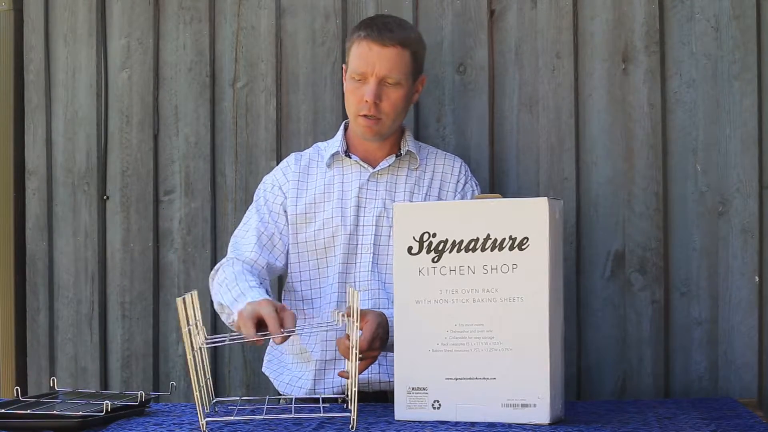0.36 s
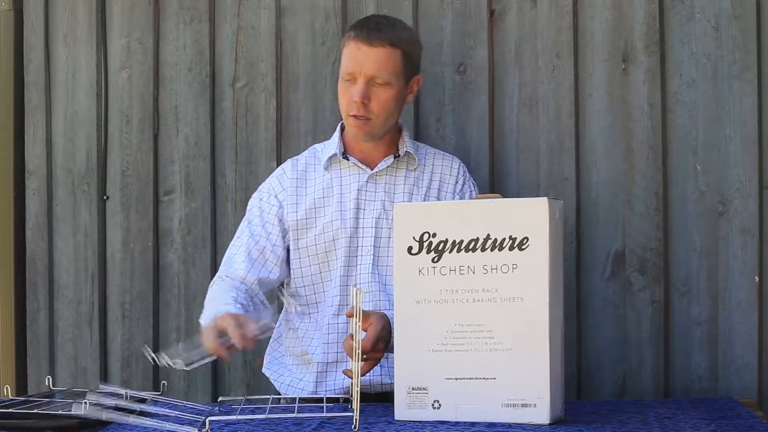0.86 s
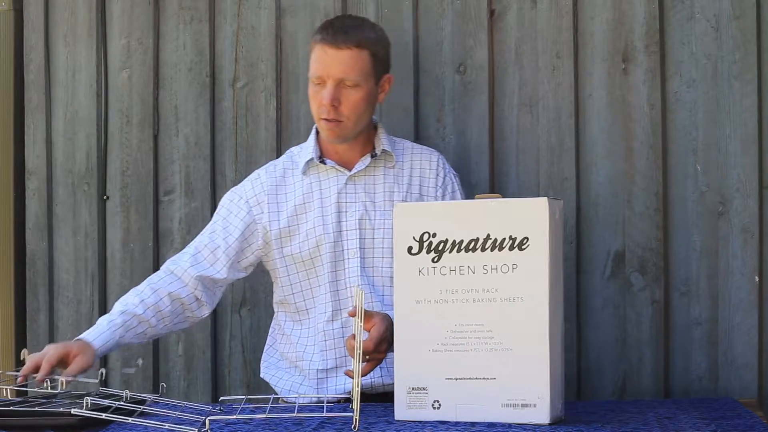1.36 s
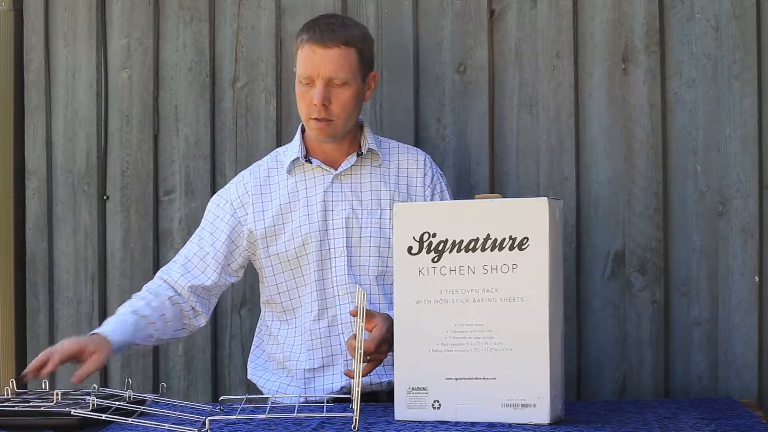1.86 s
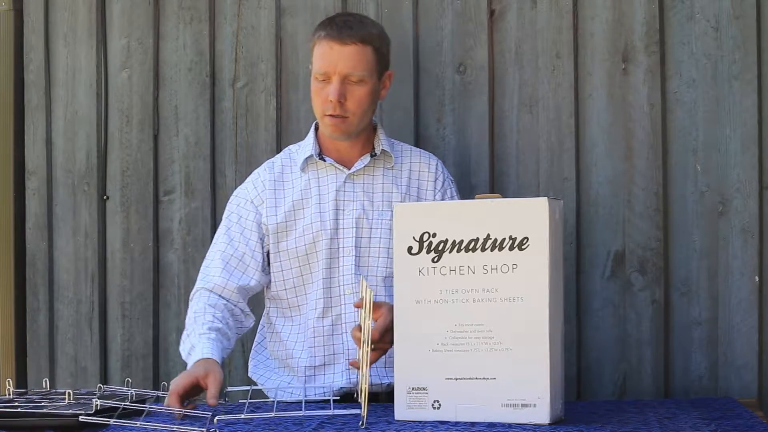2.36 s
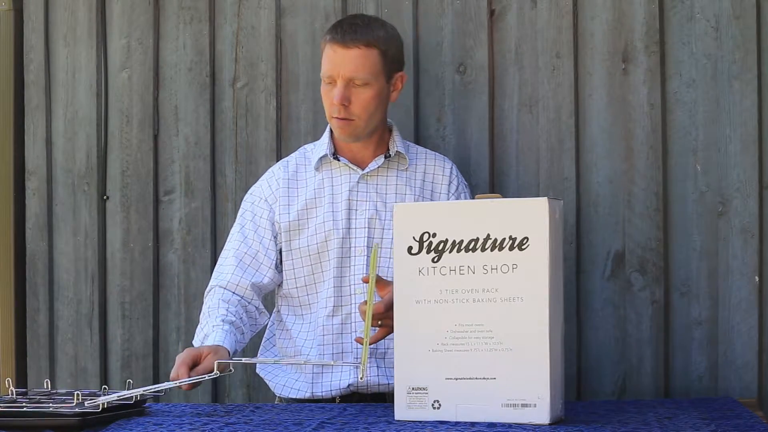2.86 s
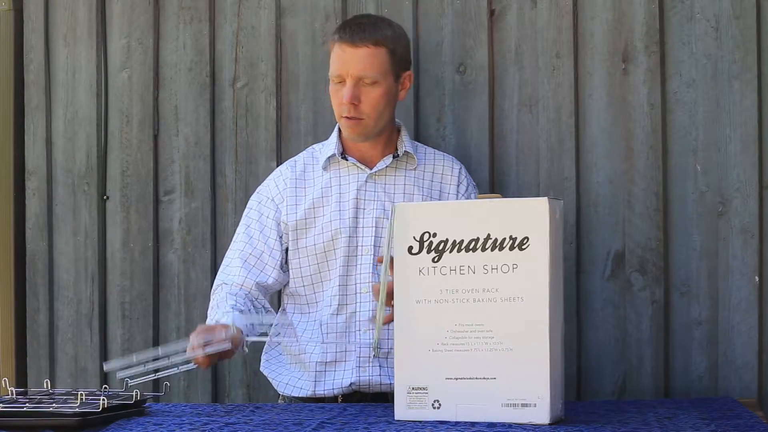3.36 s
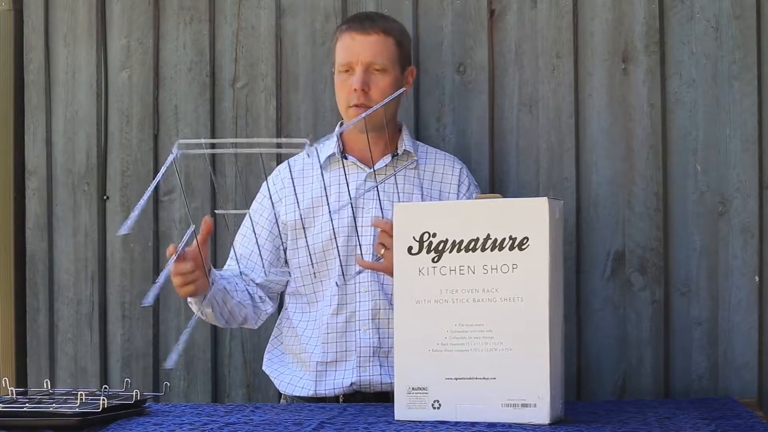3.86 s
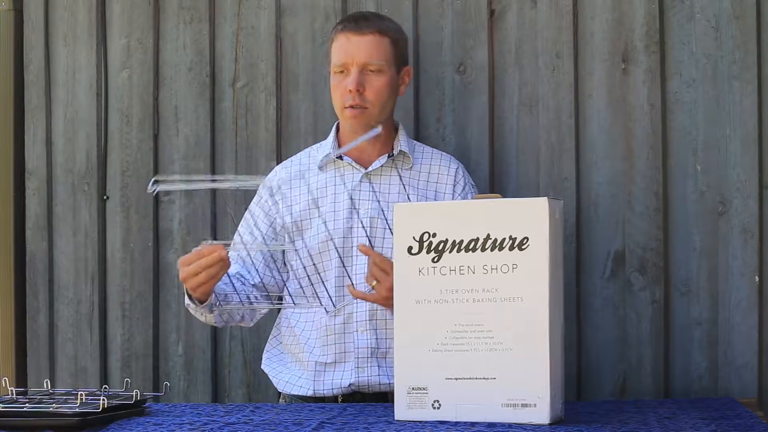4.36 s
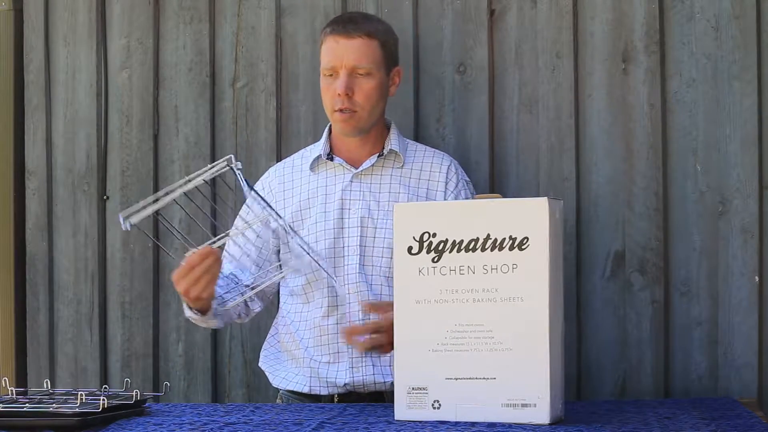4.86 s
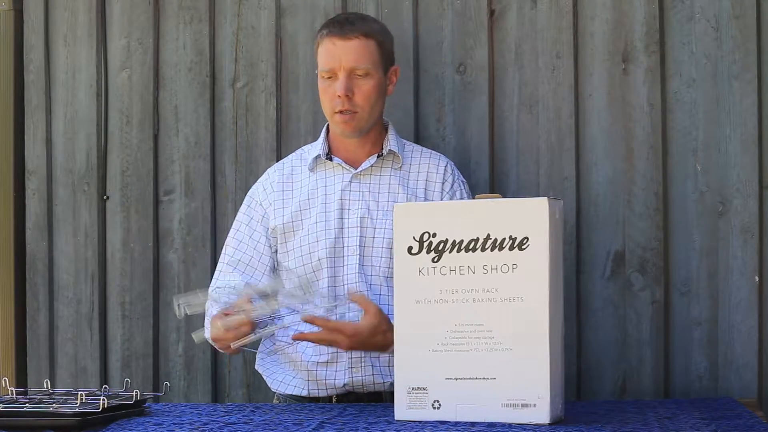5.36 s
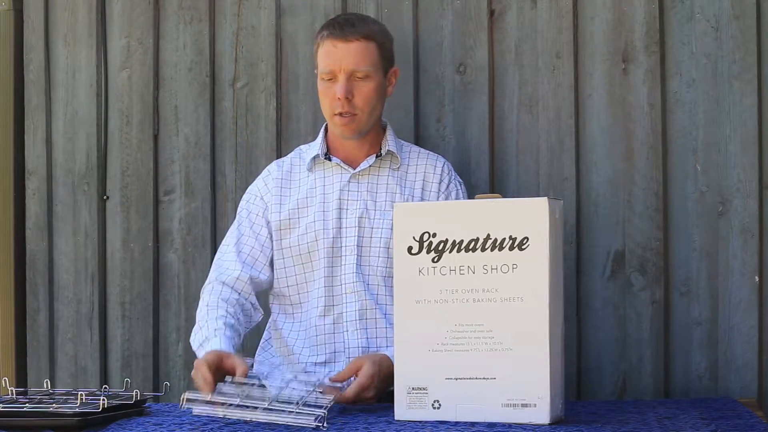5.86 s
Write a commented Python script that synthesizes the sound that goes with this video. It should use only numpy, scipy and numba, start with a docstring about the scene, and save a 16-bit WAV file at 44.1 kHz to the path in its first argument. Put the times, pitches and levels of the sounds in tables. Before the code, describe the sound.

A quiet outdoor hush with slight microphone hiss runs throughout, dry and without echo. At 0.15-0.35 s soft, cloth-muffled bumps sound on a table, with a bright, high hook clink near 0.3 s that rings thinly. At 0.77 s a hard clash of wire hits a pile of metal trays, its dense rattle continuing to about 1.2 s. After a brief lull, looser clatters come at 1.57-2.1 s, then scrapy rattling at 2.3-2.7 s and another cluster at 3.05-3.6 s, each with slight low table boom. Around 3.7-3.9 s a faint thin whistle slides upward, with a small tick. The light bare frame barely jingles until one loud, sharp clank at 4.43 s. A barely audible low hum swells near 4.9 s and fades by 5.2 s. Small crisp ticks from 5.1 s grow closer as the frame folds, ending with a strong clack at 5.85 s and a table thud at 5.95 s.

```python
"""Wire rack taken apart outdoors

A folding wire rack comes apart on a cloth-covered table before a plank wall; one microphone, no echo added.
Shelves unhook with a clink, wire clatters on a pile of trays, the bare frame knocks and ticks as it folds:
random contacts strike damped modes and noise tails. The table thuds on modes of its own. A thin whistle
rises once and a low hum comes and goes, both wavering sines, over a quiet air of coloured noise.
"""
import sys
import numpy as np
from scipy import signal
from scipy.fft import rfft, irfft
from scipy.io import wavfile
from scipy.ndimage import uniform_filter1d
from numba import njit

SR = 44100
rng = np.random.default_rng(int(sys.argv[2]) if len(sys.argv) > 2 else 0)


def attenuation_scalar(level_db):
    """Turn a level in dB into a linear amplitude multiplier (20 dB per decade)."""
    decades = np.asarray(level_db, float) / 20
    return 10 ** decades


def materialize(psi):
    """Save the field psi as 16-bit PCM at rate SR to the path in sys.argv[1].

    A 1-D psi becomes a single channel; in a 2-D psi each row is a channel.
    """
    bounded = np.clip(np.atleast_2d(psi).T, -1, 1)
    quanta = np.round(bounded * 32767).astype(np.int16)
    wavfile.write(sys.argv[1], SR, quanta)


N = 263453
T = np.arange(N) / SR  # s


def over_hz(table, hz):
    """Read a (f/Hz, value) table on a log-frequency axis."""
    f, value = np.transpose(table)
    return np.interp(np.log(np.maximum(hz, 1)), np.log(f), value)


def colour(x, table):
    """Filter a signal by the gains of a (f/Hz, level/dB) table."""
    gain = attenuation_scalar(over_hz(table, np.fft.rfftfreq(len(x), 1 / SR)))
    return irfft(rfft(x) * gain, len(x))


def unit(x):
    """Scale to energy 1."""
    return x / np.sqrt(np.sum(x ** 2))


def split(low, high, hz):
    """Bass of one sound joined to the treble of another."""
    bass = signal.sosfilt(signal.butter(4, hz, "low", fs=SR, output="sos"), low)
    treble = signal.sosfilt(signal.butter(4, hz, "high", fs=SR, output="sos"), high)
    return bass + treble


def contacts(rate, scatter_db):
    """Random instants where wire meets wire, rate per second: many faint, a few hard; mean power 1."""
    hit = rng.random(N) < rate / SR
    size = attenuation_scalar(scatter_db * rng.exponential(size=N)) * rng.choice([-1, 1], N) * hit
    return size / np.sqrt(np.mean(size ** 2))


def chatter(s, db, length, rise):
    """Force of one blow: a hard first touch just ahead of the peak, a moment of bouncing, a quick end."""
    age = np.maximum(T - s + 0.004, 0)  # starts 4 ms ahead of the listed time
    first = 1 + 1.27 * np.exp(-age / 0.003)
    onset = 1 - np.exp(-age / rise)
    ending = np.exp(-(age / max(length, 0.003)) ** 1.42)
    return attenuation_scalar(db) * first * onset * ending


def dense_body(force, spectrum, t60):
    """Countless close modes: a noise tail that dies by band, set off by every contact."""
    f, s, z = signal.stft(rng.standard_normal(SR // 2), SR, nperseg=256)
    band_t60 = over_hz(t60, f)[:, None]
    fade = attenuation_scalar(over_hz(spectrum, f)[:, None] - 60 * s / np.maximum(band_t60, 0.01))
    # slower bands start lower, so that the spectrum sets their energy
    tail = signal.istft(z * fade / np.sqrt(band_t60), SR, nperseg=256)[1]
    return signal.fftconvolve(force, unit(tail))[:N]


@njit
def ring(at, gains, poles, length):
    """Damped modes, each struck with its own gain at every contact."""
    out = np.zeros(length)
    for m in range(len(poles)):
        z, k = 1e-18 + 0j, 0
        for i in range(length):
            z *= poles[m]
            if k < len(at) and at[k] == i:
                z += gains[k, m]
                k += 1
            out[i] += z.imag
    return out


def modes(force, hz, db, t60, blows=None, focus_db=0., patchy_db=0.):
    """Clear modes; each contact wakes another mix, most near the pitch that the last blow favours."""
    at = np.flatnonzero(np.abs(force) > 1e-6)
    poles = np.exp(2j * np.pi * hz / SR - np.log(1000) / (t60 * SR))
    energy = np.sum(attenuation_scalar(db) ** 2 * t60 * SR / (4 * np.log(1000)))
    weight = attenuation_scalar(db) / np.sqrt(energy)
    gains = force[at, None] * weight * rng.standard_normal((4096, len(hz)))[at % 4096]
    # the touching wires change every 60 ms or so
    gains *= attenuation_scalar(patchy_db * rng.standard_normal((N // 2600 + 1, len(hz))))[at // 2600]
    if blows is not None:
        s, place_hz = blows
        # a blow takes over 10 ms ahead of its listed time
        last = np.maximum(np.searchsorted(s, T[at] + 0.01) - 1, 0)
        octaves = np.log2(hz / place_hz[last][:, None])
        gains *= attenuation_scalar(focus_db * np.exp(-(octaves / 0.2) ** 2))
    return ring(at, gains, poles, N)


def wires(force, spectrum, t60, lo_hz, hi_hz, stretch, count):
    """Many cross wires, each a faint line of its own; stretch scales how long they ring."""
    place, spread = rng.random(count), rng.random(count)
    hz = lo_hz + (hi_hz - lo_hz) * (np.arange(count) + place) / count
    long = stretch * over_hz(t60, hz) * (0.6 + 0.8 * spread)
    return modes(force, hz, over_hz(spectrum, hz) - 10 * np.log10(long), long, patchy_db=2.5)


def tone(curve, waver, flicker_db):
    """An unsteady, flickering sine along a pitch and level curve, fading at its ends."""
    s, hz, db = np.transpose(curve)
    drift, flutter = uniform_filter1d(rng.standard_normal((2, N)), 400) * 20
    edge = np.clip(np.minimum(T - s[0], s[-1] - T) / 0.016, 0, 1)
    pitch = np.interp(T, s, hz) * (1 + waver * drift)
    level = edge * attenuation_scalar(np.interp(T, s, db) + flicker_db * flutter)
    return np.sqrt(2) * level * np.sin(2 * np.pi * np.cumsum(pitch) / SR)


# spectrum of the open air and the microphone: f/Hz, relative level/dB per Hz
AIR_SPECTRUM = [(15, -41), (25, -14), (97, 1), (259, 1), (617, -2.5), (3150, -6), (5880, -21), (10400, -20),
                (15200, -29), (16500, -47)]


def air():
    """Steady outdoor hush and microphone hiss: coloured noise."""
    air_db = -50.5  # rms of the noise
    return attenuation_scalar(air_db) * np.sqrt(N) * unit(colour(rng.standard_normal(N), AIR_SPECTRUM))


# wire knocking: blows on the pile of racks and trays, and from 3.889 s faint knocks of the swinging frame:
# t/s, relative level/dB, chatter/s, favoured f/Hz
WIRE_KNOCKS = [(0.765, -6.5, 0.032, 2620), (0.8955, -15.5, 0.064, 2880), (0.949, -22, 0.071, 4230),
               (1.0154, -21, 0.019, 4100), (1.0876, -16, 0.019, 3800), (1.187, -23.5, 0.04, 1700),
               (1.36, -35, 0.01, 3540), (1.447, -37, 0.012, 6250), (1.569, -17.5, 0.067, 1930),
               (1.6077, -27, 0.1, 3220), (1.6996, -15, 0.069, 5530), (1.778, -19, 0.12, 3370),
               (1.976, -23.5, 0.029, 1860), (2.0787, -32, 0.045, 2580), (2.131, -35.5, 0.053, 4570),
               (2.1695, -33.5, 0.037, 6730), (2.3324, -30, 0.22, 2900), (2.427, -28, 0.062, 1590),
               (2.528, -20.5, 0.13, 1660), (2.753, -48.5, 0.3, 2880), (3.0083, -39.5, 0.036, 8000),
               (3.053, -24, 0.036, 4140), (3.1832, -21.5, 0.026, 2260), (3.2574, -24, 0.016, 3370),
               (3.3515, -20, 0.064, 1550), (3.59, -35, 0.051, 1800), (3.889, -37, 0.096, 3230),
               (4.055, -36, 0.075, 5140), (4.255, -38.5, 0.064, 2950), (4.348, -46.5, 0.36, 3300),
               (4.619, -53.5, 0.095, 4650), (5.233, -50, 0.019, 1630)]
# the pile shaking on once disturbed: start t/s, relative level/dB, steady for/s, then fall/dB per s
RATTLE = [(0.0, -39, 0.0021, 600), (0.8, -16, 0.32, 73.5), (1.74, -29, 0.031, 21), (2.44, -37, 0.067, 34),
          (3.08, -33.5, 0.41, 63)]
# clear lines of the wire clatter: f/Hz, relative level/dB
PILE_LINES = [(1028, -41), (1453, -60.5), (1529, -38.5), (1658, -39.5), (1981, -45.5), (2266, -41),
              (2837, -54.5), (2945, -40.5), (3187, -40), (3790, -66), (3978, -46.5), (4097, -50.5),
              (4651, -39), (5076, -45.5), (5399, -61), (6255, -48), (6611, -62), (7434, -40), (8344, -38),
              (8877, -61)]
# spectrum of its dense modes: f/Hz, relative level/dB per Hz
PILE_BODY = [(120, -4), (200, -8), (509, -13), (1020, -3), (1300, -8), (1500, -2), (2610, -2), (3970, -1),
             (5520, -10), (9230, -7.5), (15100, -22), (16000, -28.5)]
# time its dense modes take to fall 60 dB: f/Hz, T60/s
PILE_T60 = [(300, 0.6), (1500, 0.16), (5000, 0.15), (12000, 0.15)]


def wire_clatter():
    """Dense knocks of wire and a sparser rattle drive lines and a body, sharp contacts its treble."""
    treble_db, treble_db_per_db = -6, -0.05  # treble share of a blow at -23 dB; harder blows gain less
    rattle_treble_db = -10
    dull, bright = np.zeros(N), np.zeros(N)
    hits, taps = contacts(1800., scatter_db=2.5), contacts(600., scatter_db=1.5)
    for s, db, length, _ in WIRE_KNOCKS:
        sharp_db = db + treble_db + treble_db_per_db * (db + 23)
        dull += hits * chatter(s, db, length, rise=0.003)
        bright += hits * chatter(s, sharp_db, 1.16 * length, rise=0.00031)
    for s, db, hold, fall_db in RATTLE:
        shake = taps * (T >= s) * attenuation_scalar(db - fall_db * np.maximum(T - s - hold, 0))
        dull += shake
        bright += attenuation_scalar(rattle_treble_db) * shake

    hz, db = np.transpose(PILE_LINES)
    blows = np.transpose(WIRE_KNOCKS)[[0, 3]]
    lines = modes(dull, hz, db, 0.75 * over_hz(PILE_T60, hz), blows, focus_db=7.5, patchy_db=5.0)
    dull_body = dense_body(dull, PILE_BODY, PILE_T60)
    bright_body = dense_body(attenuation_scalar(8) * bright, PILE_BODY, PILE_T60)
    body = split(dull_body, bright_body, 5160.0)
    rods = wires(dull, PILE_BODY, PILE_T60, 800., 5500., stretch=0.71, count=80)
    spokes = wires(bright, PILE_BODY, PILE_T60, 5500., 15500., stretch=0.73, count=64)
    mix = attenuation_scalar(-14.0) * lines + attenuation_scalar(-6.5) * body + attenuation_scalar(-10.5) * rods + attenuation_scalar(-8) * spokes
    # keep the wire clatter thin: cut its bass below 190 Hz
    no_bass = signal.butter(2, 190, "high", fs=SR, output="sos")
    return signal.sosfilt(no_bass, mix)


# frame feet and hands bumping the table: t/s, relative level/dB, favoured f/Hz
THUDS = [(0.148, -34.5, 262), (0.222, -25, 359), (.242, -35, 333), (0.283, -45.5, 570), (0.333, -32, 297),
         (2.954, -44.5, 202.8), (5.9522, -22.5, 930)]
# modes of the table top: f/Hz, relative level/dB, T60/s
TABLE = [(158, -14.5, 0.25), (226, 0, .14), (302, -6, 0.14), (387, -2, 0.11), (579.5, -1, 0.057),
         (668, -1.5, 0.09), (930, -15, 0.072), (1110, -7.5, 0.065), (1460, -20.5, .03)]
# modes of the table legs: f/Hz, relative level/dB, T60/s
LEGS = [(58.7, 5, 0.59), (81.5, -3.5, 0.27)]


def table():
    """Soft bumps through the cloth, and every wire knock, boom in the table top and shake its legs."""
    thud_s, thud_legs_db = 0.034, -22  # decay of a bump in the top; share that shakes the legs
    knock_top_db, knock_thud_hz = -14, 173  # what a wire knock passes to the top
    knock_legs_db, legs_db_per_db = -44, 0.64  # the legs answer less than dB for dB
    hits = contacts(730.0, scatter_db=1.0)
    rows = [(s, db, db + thud_legs_db, hz) for s, db, hz in THUDS]
    for s, db, *_ in WIRE_KNOCKS:
        rows.append((s, db + knock_top_db, knock_legs_db + legs_db_per_db * db, knock_thud_hz))
    s, top_db, legs_db, place_hz = np.transpose(sorted(rows))
    legs = hits * sum(chatter(*row, 1.8 * thud_s, rise=0.0049) for row in zip(s, legs_db))
    top = hits * sum(chatter(*row, thud_s, rise=0.0087) for row in zip(s, top_db))
    leg_boom = modes(legs, *np.transpose(LEGS))
    top_boom = modes(top, *np.transpose(TABLE), (s, place_hz), focus_db=18.0)
    return attenuation_scalar(3.5) * leg_boom + attenuation_scalar(-6.5) * top_boom


# a shelf hook slipping off its rail: t/s, relative level/dB, chatter/s, favoured f/Hz
HOOKS = [(.2165, -51, .02, 9800), (0.232, -42, 0.1, 10700), (0.309, -21.5, 0.0094, 8000),
         (0.361, -34.5, .008, 8200), (0.395, -43, 0.024, 4457)]
# clear modes of the loose shelf: f/Hz, relative level/dB, T60/s
SHELF = [(4140, -30.5, 0.71), (4457, -16.5, 1.4), (5620, -7.5, .2), (7730, -8, 0.19), (8200, -14.5, 0.57),
         (9800, -9.5, 0.3), (12700, -6, 0.099), (13400, -5, 0.52), (15300, -15, 0.23)]
# spectrum of the dense modes of shelf and bare frame: f/Hz, relative level/dB per Hz
WIRE_BODY = [(710, -41), (1200, -23), (1770, -19), (2590, -16), (2830, -16.5), (3740, -7.5), (5840, -14),
             (10700, -2.5), (16000, -21.5)]
# time those dense modes take to fall 60 dB: f/Hz, T60/s
WIRE_T60 = [(2000, 0.14), (8000, 0.13), (15000, 0.085)]


def shelf():
    """The hook scrapes free and the loose shelf rings on a few long lines."""
    force = contacts(4000., scatter_db=2.2) * sum(chatter(*row[:3], rise=0.0008) for row in HOOKS)
    lines = modes(force, *np.transpose(SHELF), np.transpose(HOOKS)[[0, 3]], focus_db=13.0)
    return attenuation_scalar(-11.5) * lines + attenuation_scalar(-5.0) * dense_body(force, WIRE_BODY, WIRE_T60)


# a thin whistle: t/s, f/Hz, level/dB
WHISTLE = [(3.7, 4140, -36), (3.748, 4280, -70), (3.78, 5040, -56), (3.826, 6170, -61), (3.9, 6240, -65.5)]


def whistle():
    """A thin sine that rises once, its pitch and level unsteady."""
    return tone(WHISTLE, 0.007, 3.5)


# bars of the bare frame knocking: t/s, relative level/dB, chatter/s, favoured f/Hz of thin bars, of thick bars
TICKS = [(3.8476, -30.5, 0.0092, 9840, 2460), (4.1194, -53, 0.016, 13500, 4000),
         (4.4256, -5, 0.025, 10000, 3800), (4.79, -43.5, 0.01, 9040, 3730), (4.887, -56, .02, 9100, 4600),
         (5.093, -33.5, 0.014, 9780, 3800), (5.1347, -40, 0.016, 8280, 3000),
         (5.328, -27, 0.033, 8900, 5700), (5.4395, -39, 0.014, 9190, 3690),
         (5.475, -30, 0.019, 10100, 4030), (5.515, -29, 0.017, 14800, 3600),
         (5.6037, -24.5, 0.023, 15100, 3200), (5.85, -13.5, 0.035, 11000, 2665),
         (5.953, -29.5, .03, 10300, 5200)]
# clear modes of the frame: f/Hz, relative level/dB, T60/s
FRAME = [(2680, -11, 0.52), (3450, -7, 0.38), (3960, -15.5, 0.77), (4500, 2, 0.1), (5770, -8, 0.18),
         (7390, 11, 0.29), (7800, -3, .25), (8300, 5, 0.18), (9100, -5, 0.19), (9800, 5.5, 0.03),
         (10700, -42, 0.044), (11730, -13, 0.089), (12400, -14, 0.092), (13500, 0, .11), (14210, -8, 0.27),
         (14910, 4, 0.17), (15400, -11, 0.13)]
# the loose frame jingling in the air: t/s, relative level/dB
SWING = [(3.75, -81), (4.0, -73), (4.4, -70), (4.55, -77), (5.0, -71), (5.8, -64)]


def frame():
    """Thin bars tick, thick bars sound the range below them, and the cross wires jingle faintly."""
    thick_share_db, thick_db_per_db = 1.5, -0.39  # share of the thick bars in a -25 dB knock; its slope
    hits = contacts(4000., scatter_db=1.5)
    s, db, length, thin_hz, thick_hz = np.transpose(TICKS)
    thick_db = db + thick_share_db + thick_db_per_db * (db + 25)
    thick = hits * sum(chatter(*row, rise=0.0066) for row in zip(s, thick_db, length))
    thin = hits * sum(chatter(*row, rise=0.0031) for row in zip(s, db, length))
    # next to silent outside the swing
    jingle = contacts(120., scatter_db=4.) * attenuation_scalar(np.interp(T, *np.transpose(SWING), -200, -200))
    spokes = wires(attenuation_scalar(-23) * thin + jingle, WIRE_BODY, WIRE_T60, 2500., 15500., stretch=2.4, count=90)

    def bars(force, place_hz):
        """Clear modes near each knock's pitch, and a dense body."""
        lines = modes(force, *np.transpose(FRAME), (s, place_hz), focus_db=19.5, patchy_db=5.0)
        return attenuation_scalar(-21.5) * lines + attenuation_scalar(-6.5) * dense_body(force, WIRE_BODY, WIRE_T60)

    return split(bars(thick, thick_hz), bars(thin, thin_hz), 8600.0) + spokes


# a low hum: t/s, f/Hz, level/dB
HUM = [(3.95, 109.6, -69), (4.914, 109.8, -59.5), (5.2, 114, -69)]


def hum():
    """A low, wavering sine that comes and goes."""
    return tone(HUM, 0.019, 1.5)


def scene():
    """All sources reach one microphone; both channels are alike."""
    mono = wire_clatter() + shelf() + frame() + table() + whistle() + hum() + air()
    return np.array([mono, mono])


def top_cut(x):
    """Nothing passes above the cut-off."""
    return signal.sosfilt(signal.butter(12, 16820, fs=SR, output="sos"), x)


def record(dry):
    """The treble is cut steeply above 15.9 kHz."""
    steep = signal.ellip(10, 0.2, 60, 15900, fs=SR, output="sos")
    mix = signal.sosfilt(steep, dry)
    return top_cut(mix)


dry = scene()
out = record(dry)
materialize(out)
```